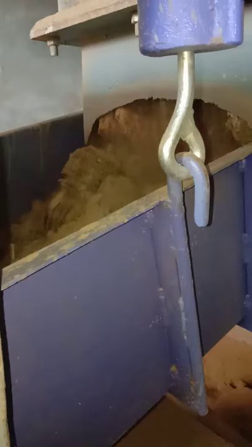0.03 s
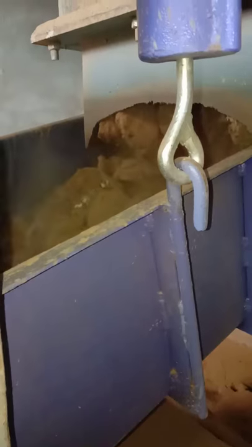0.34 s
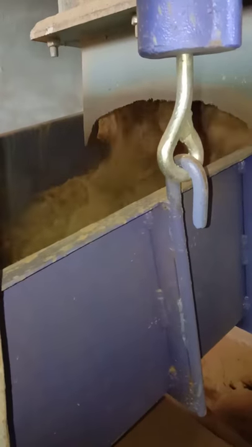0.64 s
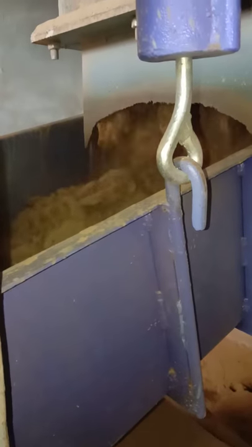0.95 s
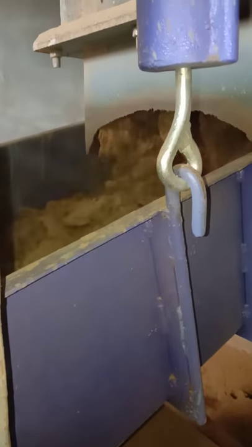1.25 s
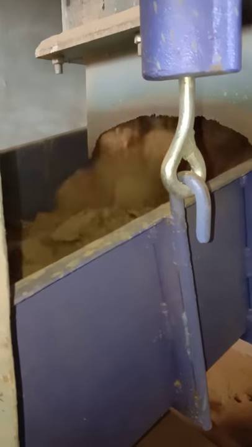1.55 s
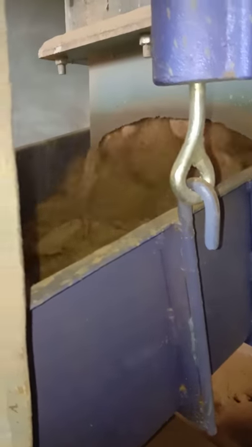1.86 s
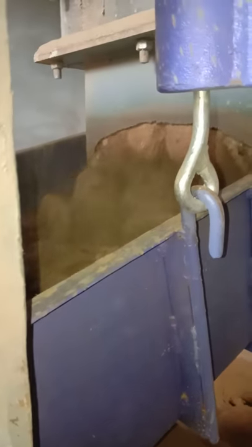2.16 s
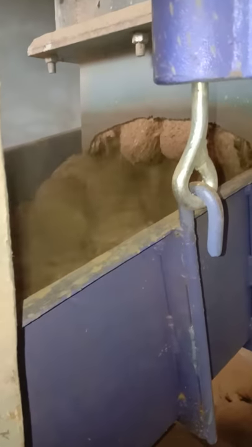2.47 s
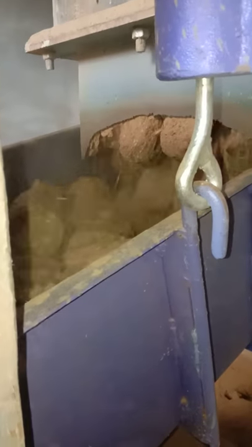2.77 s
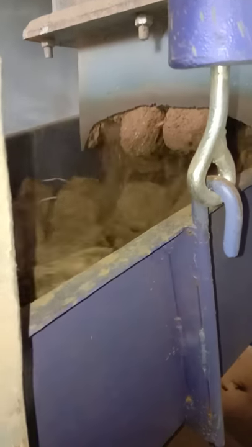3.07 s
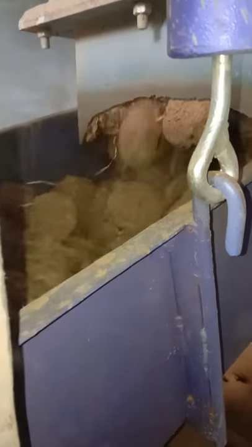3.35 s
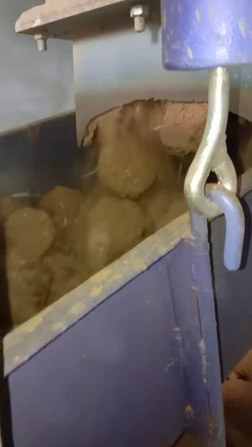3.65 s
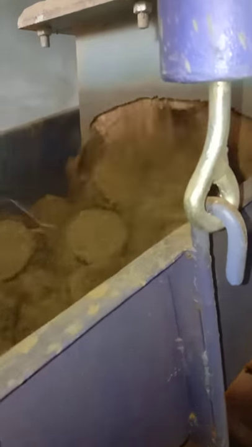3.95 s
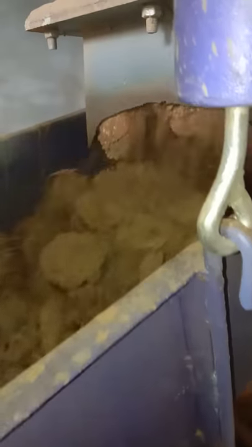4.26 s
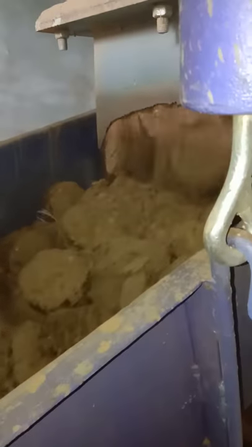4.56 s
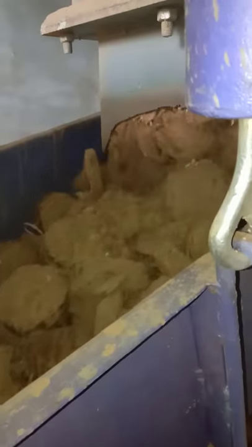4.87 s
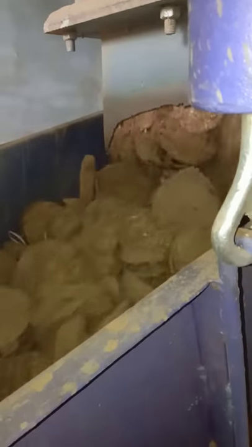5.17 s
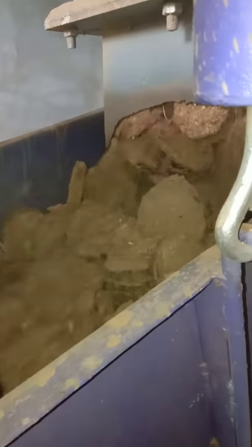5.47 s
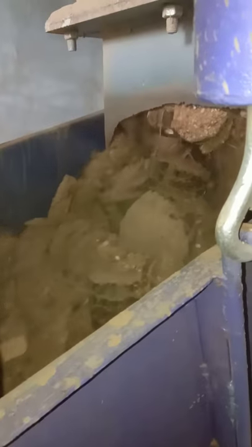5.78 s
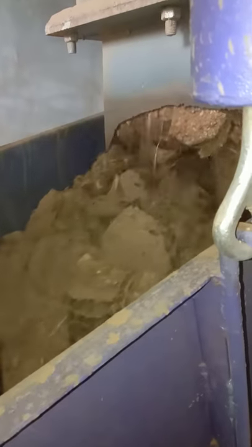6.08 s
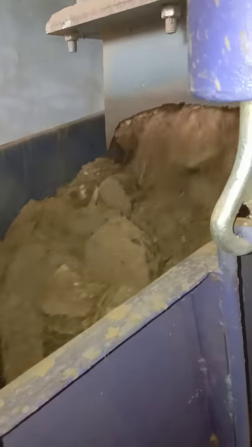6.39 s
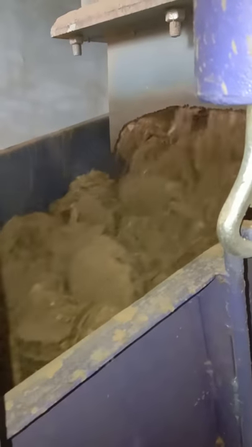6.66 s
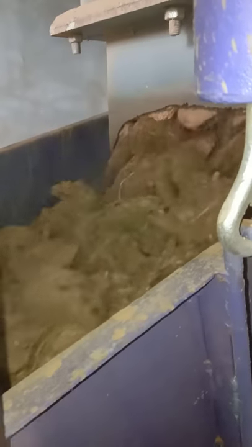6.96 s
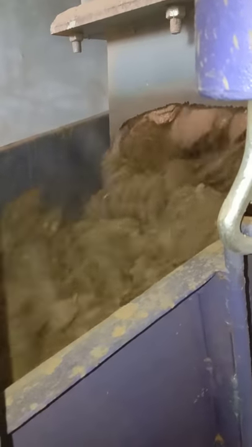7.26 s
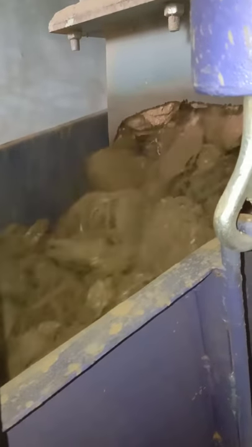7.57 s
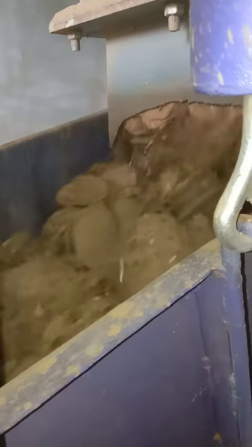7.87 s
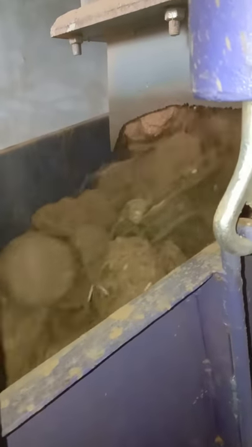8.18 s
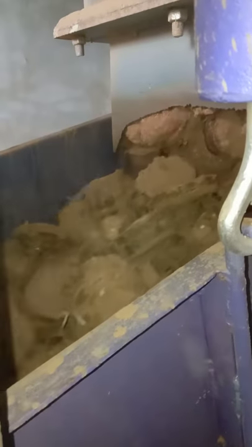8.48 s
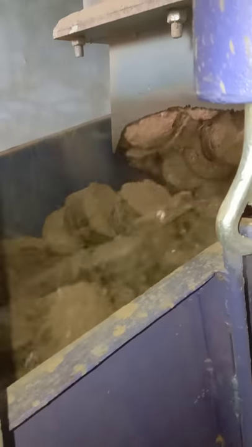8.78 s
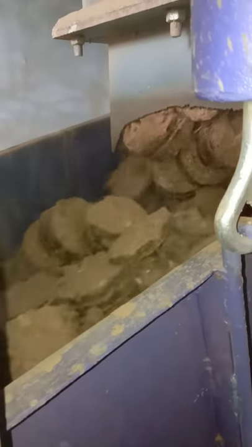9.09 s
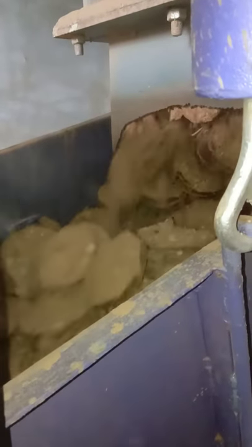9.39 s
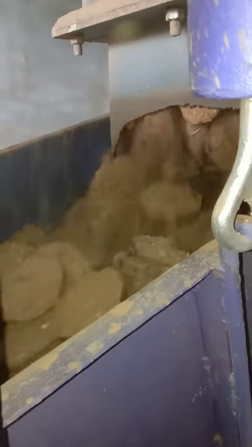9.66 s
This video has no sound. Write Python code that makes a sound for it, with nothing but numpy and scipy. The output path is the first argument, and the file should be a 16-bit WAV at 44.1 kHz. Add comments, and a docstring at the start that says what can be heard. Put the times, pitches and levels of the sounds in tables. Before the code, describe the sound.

Soft lumps rumble and knock through a humming, shaking metal trough as grit hisses and other factory machines drone.

```python
"""Vibrating feeder in a plant hall

An electromagnetic feeder hums as it shakes a steel trough fifty times a second. Clods drop from a
chute, thud and rumble; crumbs crunch and fine grit hisses with each stroke. A steel hanger chatters,
hard bits scrape the wall and a lump rattles the chute, while other machines drone and whine.
Two microphone ports stand close by, the left one facing the trough."""
import sys
import numpy as np
from scipy import signal
from scipy.fft import rfft, irfft, next_fast_len
from scipy.io import wavfile
from scipy.ndimage import uniform_filter1d

SR = 44100
rng = np.random.default_rng(int(sys.argv[2]) if len(sys.argv) > 2 else 0)


def waveform_to_disk(signal):
    """Save audio, clipped to [-1, 1], as 16-bit WAV at the path in sys.argv[1]."""
    frames = np.transpose(np.atleast_2d(signal))
    scaled = np.clip(frames, -1, 1) * 32767
    samples = np.round(scaled).astype(np.int16)
    wavfile.write(sys.argv[1], SR, samples)


N = 437913
TIME = np.arange(N) / SR
FFT_SIZE = next_fast_len(N + 16384, real=True)
BIN_HZ = np.maximum(np.arange(FFT_SIZE // 2 + 1) * SR / FFT_SIZE, 1)


def from_db(db):
    """Decibels to gain."""
    return 10 ** (np.asarray(db) / 20)


def unit_rms(x):
    """Scale to unit power."""
    return x / np.sqrt(np.mean(x ** 2) + 1e-20)


def in_time(rows):
    """Columns of an automation curve at every sample."""
    times, *columns = np.transpose(rows)
    return [np.interp(TIME, times, column) for column in columns]


def in_frequency(rows):
    """Columns of an EQ curve at every bin."""
    hz, *columns = np.transpose(rows)
    return [np.interp(np.log(BIN_HZ), np.log(hz), column) for column in columns]


def drift(rate):
    """Slow random wander of spread 1, changing about `rate` times a second."""
    hop, run_in = 40, 2000
    pole = np.exp(-2 * np.pi * rate * hop / SR)
    noise = rng.standard_normal(N // hop + run_in + 2)
    slow = signal.lfilter([1], [1, -2 * pole, pole * pole], noise)[run_in:]
    return np.interp(np.arange(N) / hop, np.arange(len(slow)), unit_rms(slow))


def contacts(per_s, spread_db, t60, colour, spots=10):
    """Random touches of uneven size, dealt to spots that each ring briefly with their own dense modes."""
    sizes = from_db(spread_db * np.minimum(rng.exponential(1, N), 4)) * rng.choice([-1, 1], N)
    clicks = sizes * (rng.random(N) < per_s / SR)
    spot, age = rng.integers(0, spots, N), TIME[:2048]
    spectra = rfft(rng.standard_normal((spots, len(age))) * from_db(-60 * age / t60), 2 * len(age))
    rings = irfft(spectra / np.linalg.norm(spectra, axis=0))[:, :len(age)]   # together, a flat spectrum
    sound = sum(signal.oaconvolve(clicks * (spot == k), rings[k])[:N] for k in range(spots))
    eq = from_db(in_frequency(colour)[0])
    return unit_rms(irfft(rfft(sound, FFT_SIZE) * eq, FFT_SIZE)[:N])


def evened(x, window_s):
    """Hold the power steady over a short window, so that the flow sets the level."""
    size = int(window_s * SR)
    return x / np.sqrt(uniform_filter1d(uniform_filter1d(x ** 2, size), size) + 1e-9)


def ring(clicks, hz, t60):
    """One mode of steel: a unit click starts a decaying sine of height 1."""
    pole, step = from_db(-60 / (t60 * SR)), 2 * np.pi * hz / SR
    return signal.lfilter([np.sin(step)], [1, -2 * pole * np.cos(step), pole * pole], clicks + 1e-18)


# The drive's hum. Each row: multiple of the stroke rate, relative level in dB.
HUM_HARMONICS = [(1, -35), (2, -34.5), (3, -46), (4, -34.5), (6, -38), (7, -38.5), (8, -37.5), (9, -38),
                 (10, -43), (11, -49), (14, -46), (15, -61), (16, -49), (17, -49), (18, -52), (19, -49),
                 (21, -52.5), (29, -52)]
# The ninth harmonic swells and sinks. Each row: time in seconds, relative level in dB.
NINTH_RIDE = [(0.4, -6), (1.2, -4), (1.45, 0), (1.8, -3.5), (2.5, -1.5), (3.3, 7), (3.8, 0.5), (4.35, 2.5),
              (4.7, -3), (5.2, 3), (5.7, -0.5), (6.25, -1), (6.9, 4.5), (7.25, -1), (7.55, 0), (8.1, 1.5),
              (8.7, 5.5), (9.9, 2)]

def drive_hum(stroke, level_db, waver_db, smear_rad):
    """Harmonics of the stroke; the shifting load makes them waver in level and phase."""
    out = np.zeros(N)
    ninth_db, = in_time(NINTH_RIDE)
    for multiple, db in HUM_HARMONICS:
        swell_db = ninth_db - ninth_db.mean() if multiple == 9 else waver_db * drift(3)
        phase = multiple * stroke + smear_rad * drift(4.2) + 2 * np.pi * rng.random()
        out += from_db(db + swell_db) * np.sin(phase)
    return np.sqrt(2) * from_db(level_db) * out


# The bed of drones and whines. Each row: pitch in Hz, width in Hz, relative level in dB.
MACHINE_TONES = [(116.3, 1.5, -30.5), (135.3, 2, -35), (172.5, 2.5, -34.5), (246.2, 1.5, -33.5),
                 (261.8, 1, -41.5), (595.5, 1.5, -48), (4892, 22, -50), (6455, 25, -51)]

def machinery(level_db, restless):
    """Narrow, restless tones from motors and bearings in the hall."""
    out = np.zeros(N)
    for hz, width, db in MACHINE_TONES:
        phase = 2 * np.pi * np.cumsum(hz + .5 * width * drift(width)) / SR
        out += np.sqrt(2) * from_db(db) * (1 + restless * drift(width)) * np.sin(phase)
    return from_db(level_db) * out


# The hanger's ring. Each row: pitch in Hz, relative level in dB, time to fall 60 dB in seconds.
HANGER_MODES = [(2150, -52, .03), (2325, -48, .07), (2510, -57, .07), (3229, -56, .15), (4330, -54, .02),
                (4524, -55.5, .09), (5280, -55.5, .025), (6390, -48.5, .03), (6480, -47.2, .033)]
# How hard it chatters. Each row: time in seconds, relative level in dB.
HANGER_RIDE = [(.4, -.5), (.8, 4), (1.25, 3), (1.42, -1), (1.65, 4), (2.08, -0.5), (2.48, -2), (3.55, -12),
               (3.86, -4), (4.3, -6), (4.9, 0), (5.02, 2), (5.6, 1), (5.8, -6), (6.15, 2), (6.33, -4),
               (7.05, -5), (7.18, 1), (7.7, -0.5), (8.1, 2), (8.45, -2), (9.15, -0.5), (9.6, -5), (9.9, 4)]

def hanger_chatter(per_s, spread_db, level_db):
    """Uneven taps of hook on eye keep the steel ringing; each tap strikes every mode differently."""
    taps = np.flatnonzero(rng.random(N) < per_s * from_db(1.8 * drift(20)) / SR)
    force = from_db(spread_db * rng.standard_normal(N)[taps])
    out = np.zeros(N)
    for hz, db, t60 in HANGER_MODES:
        clicks = np.zeros(N)
        clicks[taps] = force * rng.standard_normal(N)[taps]
        out += from_db(db) * unit_rms(ring(clicks, hz, t60))
    return from_db(level_db + in_time(HANGER_RIDE)[0]) * out


# How the stroke bunches the small landings. Each row: multiple of the stroke rate, depth in dB.
TOSS_PULSE = [(1, .75), (2, .95), (3, .75)]
# Small stuff pouring from the chute. Each row: time in seconds, crunch level in dB, hiss level in dB.
FINES_RIDE = [(0.4, -32, -36), (0.9, -31.5, -34.5), (1.4, -33, -35.5), (1.65, -30.5, -33.5),
              (2.5, -32, -35.5), (2.9, -32.5, -36), (3.15, -31, -32.5), (3.9, -32.5, -34.5),
              (5.65, -31, -34.5), (5.9, -30.5, -35), (6.22, -31, -34), (6.32, -34, -37.5),
              (6.43, -31.5, -34.5), (7.15, -32, -33.5), (7.65, -29.3, -32.5), (7.9, -31.5, -33),
              (9.9, -31.5, -35)]
# The midrange crunch of crumbs and the bright hiss of grit. Each row: frequency in Hz, gain in dB.
CRUNCH_EQ = [(150, -20), (450, -1), (750, 2), (1050, -1.5), (1420, 1.2), (1650, -2.3), (2100, -3.3),
             (2450, -2.8), (2800, -11.5), (5000, -18), (12000, -38)]
GRIT_EQ = [(1000, -30), (3200, -8), (4400, -5.3), (5700, -3.3), (6500, 0), (6900, -.5), (7400, -5.3),
           (8000, -10), (9000, -14.3), (11000, -16), (11900, -18), (13000, -16.3), (15300, -14.5)]

def crumbs_and_grit(stroke, wander_db):
    """Small bits are tossed by each stroke and land in loose bursts."""
    crunch_db, hiss_db = in_time(FINES_RIDE) + wander_db
    toss = from_db(sum(db * np.cos(multiple * stroke) for multiple, db in TOSS_PULSE))
    shower = drift(12)   # a breaking clod sheds crumbs and grit together
    crunch = contacts(7000 * toss * from_db(1.1 * shower), spread_db=2.5, t60=0.0099, colour=CRUNCH_EQ)
    grit = contacts(7000 * toss * from_db(1.9 * shower), spread_db=2.0, t60=0.007, colour=GRIT_EQ)
    return (from_db(crunch_db) * evened(crunch, window_s=0.13)
            + from_db(hiss_db) * evened(grit, window_s=0.18))


# Brief dips in the low rumble. Each row: centre in seconds, length in seconds, depth in dB.
RUMBLE_DIPS = [(0.953, 0.092, -14), (1.39, 0.063, -12), (1.89, 0.066, -12), (2.116, 0.044, -8),
               (2.53, .04, -8), (3.02, 0.045, -10), (3.652, .07, -7), (4.22, .06, -6), (4.40, .06, -9),
               (4.67, 0.06, -7), (5.63, 0.073, -9), (6.773, 0.14, -14), (7.264, .05, -5), (8.06, 0.081, -3),
               (8.646, 0.042, -7), (9.116, .07, -10), (9.45, 0.1, -8)]

def rumble_dip_db():
    """Brief, smooth dips in the level of the low rumble, shared in part by the drone."""
    return sum(db * np.exp(-(2 * (TIME - centre) / length) ** 2) for centre, length, db in RUMBLE_DIPS)


def tumbling_db(clods, stream_db, wander_db):
    """Level of an uneven stream of lumps; each big clod adds a swell as it rolls on and settles."""
    rise_s, fade_s, roll_db = 0.015, 0.015, -9   # the roll sits under the blow that starts it
    power = from_db(stream_db + wander_db * drift(5.8)) ** 2
    for start_s, db, _, roll_s in clods:
        start = int(start_s * SR)
        age = TIME[:min(SR // 2, N - start)]
        swell = np.minimum(age / rise_s, 1) * np.exp(-np.maximum(age - roll_s, 0) / fade_s)
        power[start:start + len(age)] += (from_db(db + roll_db) * swell) ** 2
    return 10 * np.log10(power)


# Deep rumble of lump on floor, rounder knock of lump on lump. Each row: frequency in Hz, gain in dB.
RUMBLE_EQ = [(10, -28), (25, -33), (42, -23), (58, -10.5), (72, -3.5), (85, -0.5), (93, 2), (104, -3),
             (122, -1), (146, -14), (170, -11.5), (250, -25.5), (600, -72)]
KNOCK_EQ = [(50, -44), (110, -14), (165, -3), (230, -1), (290, -4), (350, -7), (430, -10), (700, -16.5),
            (1500, -50), (5000, -75)]

def lump_stream(rumble_db, knock_db):
    """Soft lumps tumble on the trough floor and against one another."""
    rumble = evened(contacts(per_s=1500, spread_db=2.3, t60=0.03, colour=RUMBLE_EQ), window_s=0.071)
    knocks = evened(contacts(per_s=1500, spread_db=2.5, t60=0.031, colour=KNOCK_EQ), window_s=0.036)
    return from_db(rumble_db) * rumble + from_db(knock_db) * knocks


# Heavy clods land in the trough, and bump into one another.
# Each row: start in seconds, relative level in dB, centre pitch in Hz, roll in seconds.
CLOD_LANDINGS = [(.255, -11.5, 135, .02), (0.31, -14.5, 97, 0.047), (.5, -19, 90, 0.037),
                 (.566, -21, 114, .02), (0.626, -18.5, 112, 0.027), (.781, -19.5, 129, .04),
                 (1.19, -22, 116, 0.018), (1.435, -13, 104, 0.039), (1.563, -14, 124.6, 0.037),
                 (1.729, -15, 106, .03), (1.965, -19, 108, .02), (2.149, -14, 86.5, 0.057),
                 (2.337, -19, 116, .02), (2.453, -10.5, 105, 0.028), (2.555, -21, 118, 0.018),
                 (2.622, -13, 128, .022), (2.73, -22, 117, .02), (3.078, -17, 101, 0.049),
                 (3.714, -15, 127, .03), (3.821, -10.5, 116, .03), (3.933, -16, 121, .03),
                 (4.073, -13, 101, 0.08), (4.474, -10, 86, 0.044), (4.717, -16, 99, 0.037),
                 (4.798, -21, 121, 0.05), (4.954, -12.5, 117, 0.025), (5.056, -16, 116, 0.034),
                 (5.211, -18, 98, 0.045), (5.3, -19, 109, .04), (5.384, -14.5, 97, 0.046),
                 (5.672, -24, 100, .02), (5.775, -13, 103, 0.054), (5.83, -16.5, 88, 0.094),
                 (5.956, -12.5, 115.5, 0.024), (6.019, -18, 116, 0.017), (6.308, -13.5, 101, .03),
                 (6.619, -16, 110, 0.021), (6.843, -20, 102, .03), (7.442, -16, 93.5, .04),
                 (7.497, -14, 106, 0.04), (7.559, -19, 114, .03), (7.608, -19, 107.5, 0.045),
                 (7.817, -19, 105, .03), (7.921, -21, 88, .03), (8.15, -15.5, 93, 0.027),
                 (8.36, -20, 113, .02), (8.418, -17, 111, .03), (8.503, -21, 116, .02),
                 (8.57, -17.5, 89, .03), (8.68, -15.5, 118, 0.022), (8.798, -19, 82, 0.034),
                 (8.968, -20, 112, .02), (9.022, -21, 99, .02), (9.253, -13.5, 107, .025),
                 (9.352, -18, 107, .02), (9.543, -16.5, 94, 0.043), (9.718, -9, 103, 0.055),
                 (9.841, -19, 117, .03)]
CLOD_BUMPS = [(.405, -20, 207, .02), (.823, -21, 208, .02), (1.281, -19.5, 178, 0.03),
              (1.338, -19, 184, 0.027), (1.726, -20, 278, 0.025), (1.782, -21.5, 228, .02),
              (1.94, -17, 168, 0.023), (2.171, -17.5, 218, 0.041), (2.344, -16, 180, 0.017),
              (2.675, -15.5, 224, 0.031), (2.989, -20.5, 244, 0.023), (3.762, -14.5, 212, 0.023),
              (4.521, -16, 236, 0.049), (4.584, -17.5, 228, 0.019), (4.635, -16.5, 240, 0.018),
              (4.79, -14.5, 163, 0.042), (4.884, -20.5, 212, 0.031), (5.085, -20.5, 182, 0.018),
              (5.307, -19, 180, .02), (5.456, -14, 183, 0.043), (6.635, -15.5, 168, .06),
              (7.698, -16.5, 172, 0.03), (7.876, -25, 228, .02), (8.179, -17, 210, 0.048),
              (8.3, -20, 200, 0.044), (8.953, -18.5, 169, 0.025), (9.614, -18, 224, 0.018),
              (9.661, -14.5, 209, 0.064), (9.83, -15.5, 248, .03)]

def clod_thumps(clods, rise_s, fade_s, sag, level_db):
    """A soft clod squashes and rebounds in a few swings; size sets the pitch, which sags as it settles."""
    out = np.zeros(N)
    for (start_s, db, hz, _), phase in zip(clods, rng.random(len(clods))):
        start = int(start_s * SR)
        age = TIME[:min(SR // 4, N - start)]
        attack = np.sin(np.pi / 2 * np.minimum(age / rise_s, 1)) ** 2
        push = attack / np.cosh(np.maximum(age - rise_s, 0) / fade_s)
        pitch = hz * (1 + sag * (2 * np.exp(-age / (rise_s + fade_s)) - 1))
        swing = np.sin(2 * np.pi * (np.cumsum(pitch) / SR + phase))
        out[start:start + len(age)] += from_db(db) * push * swing
    return from_db(level_db) * out


# The loaded trough's boom. Each row: pitch in Hz, relative level in dB, time to fall 60 dB in seconds.
TROUGH_MODES = [(79.7, -2.5, 0.24), (107.5, -2.5, 0.2), (124.4, 2.5, 0.28)]

def trough_boom(level_db, squash_s):
    """Each landing sets the lowest modes of the trough swinging."""
    out = np.zeros(N)
    for start_s, db, *_ in CLOD_LANDINGS:
        start = int(start_s * SR)
        age = TIME[:min(SR // 2, N - start)]
        push = 1 - np.exp(-age / squash_s)
        for hz, mode_db, t60 in TROUGH_MODES:
            swing = np.sin(2 * np.pi * (hz * age + rng.random()))
            out[start:start + len(age)] += push * from_db(db + mode_db - 60 * age / t60) * swing
    return from_db(level_db) * out


# Hard bits strike or scrape the wall. Each row: start in seconds, relative level in dB,
# low and high band edges in Hz, rise and fade in seconds.
WALL_SCRAPES = [(1.625, -29, 1900, 5000, 0.013, .04), (1.710, -40, 4300, 8000, 0.0027, .02),
                (1.779, -31, 5500, 8000, .003, .015), (2.969, -32, 3000, 8000, .002, .008),
                (3.112, -33, 6500, 14500, .004, .035), (3.331, -32, 5500, 14500, .003, .015),
                (3.358, -33, 5500, 14000, .003, .014), (4.004, -27, 4000, 8850, 0.0023, .01),
                (4.230, -28, 900, 2760, 0.0092, 0.055), (4.235, -36, 8900, 12000, 0.017, .035),
                (4.775, -34.5, 7000, 14000, .005, .02), (5.382, -27, 4000, 7500, .003, 0.015),
                (5.860, -30, 950, 2200, 0.013, 0.036), (6.640, -23, 500, 1400, 0.007, 0.02),
                (7.020, -31, 1600, 4000, .003, .012), (7.404, -24, 5000, 7550, 0.0034, .008),
                (7.425, -29, 7300, 8400, .012, .028), (7.503, -24, 1800, 2800, 0.0034, .006),
                (7.534, -22, 1600, 2700, 0.0026, 0.0046), (7.600, -26, 1100, 4400, .035, 0.05),
                (7.618, -22, 1650, 2550, .004, 0.022), (7.642, -22.5, 1650, 2600, 0.004, .018),
                (7.674, -29, 1700, 2700, .004, .016), (8.065, -26, 550, 1400, 0.0073, 0.017),
                (8.415, -31, 4500, 7500, .003, .012), (8.919, -28, 4000, 7500, .003, .012),
                (9.215, -28, 500, 1400, 0.0087, 0.016)]

def wall_scrapes(level_db, grains_per_s):
    """Each hard bit skips over the steel in a short, grainy rasp."""
    out, age = np.zeros(N), TIME[:SR // 3]
    for start_s, db, low, high, rise, fade in WALL_SCRAPES:
        grains = rng.choice([-1, 1], len(age)) * (rng.random(len(age)) < grains_per_s / SR)
        band = signal.butter(2, [low, high], "band", fs=SR, output="sos")
        rasp = unit_rms(signal.sosfilt(band, grains))
        pressure = np.minimum(age / rise, 1) * np.exp(-np.maximum(age - rise, 0) / fade)
        start = int(start_s * SR)
        out[start:start + len(age)] += from_db(db) * pressure * rasp
    return from_db(level_db) * out


# A hard lump rattles against the chute. Each row: start in seconds, strength in dB.
RATTLE_TAPS = [(5.848, -1), (5.866, -1), (5.884, -2), (5.925, -7)]
# The chute's clang. Each row: pitch in Hz, relative level in dB, time to fall 60 dB in seconds.
CHUTE_MODES = [(750, -37, .1), (1122, -27, .13), (1300, -30, 0.16), (1840, -38, .1)]

def chute_rattle(level_db):
    """A few quick, uneven taps set the sheet steel of the chute ringing."""
    tap_s, tap_db = np.transpose(RATTLE_TAPS)
    out = np.zeros(N)
    for hz, mode_db, t60 in CHUTE_MODES:
        strike_s = tap_s + rng.random(len(tap_s)) / hz   # up to a cycle late, for a random phase
        clicks = np.zeros(N)
        clicks[(strike_s * SR).astype(int)] = from_db(tap_db + mode_db)
        out += ring(clicks, hz, t60)
    return from_db(level_db) * out


# The stereo image. Each row: frequency in Hz, left port's extra level in dB,
# its phase lead in radians on top of the lag, likeness of the two ports from 0 to 1.
PORT_IMAGE = [(50, 4.7, -.3, .995), (150, 3.4, -.2, .996), (300, 4.7, -.17, .993), (700, 8.7, -.08, .986),
              (1400, 6.9, -.04, .94), (2200, 7.2, -.03, .87), (3000, 6.5, -.05, .74),
              (5000, 7.2, -.08, .83), (6500, 3.1, -.1, .92), (7500, .8, -.12, .85), (9000, 0, -.2, .88),
              (15000, 0, -.3, .88)]

def microphone_ports(sound, lag_s, hall_t60):
    """The right port hears the sound later and shaded, mixed with scatter from the hall."""
    louder_db, lead, alike = in_frequency(PORT_IMAGE)
    age = TIME[:16384]
    hall = rng.standard_normal(len(age)) * from_db(-60 * age / hall_t60)
    scatter = rfft(hall / np.linalg.norm(hall), FFT_SIZE)
    direct = np.exp(-1j * (2 * np.pi * BIN_HZ * lag_s + lead))
    path = from_db(-louder_db) * (alike * direct + np.sqrt(1 - alike ** 2) * scatter)
    right = irfft(rfft(sound, FFT_SIZE) * path, FFT_SIZE)[:N]
    return np.array([sound, right])


def gain_control(stereo, threshold_db, squeeze, react_s, recover_db_per_s):
    """Loud moments on the left pull both channels down, so the hiss ducks under each heavy thud."""
    pole = np.exp(-1 / (react_s * SR))
    power = signal.lfilter([1 - pole], [1, -pole], stereo[0] ** 2)
    over_db = np.maximum(10 * np.log10(power + 1e-12) - threshold_db, 0)
    recovery_db = recover_db_per_s * TIME
    held_db = np.maximum.accumulate(over_db + recovery_db) - recovery_db
    return stereo * from_db(-squeeze * held_db)


def scene():
    """Feeder, material and hall, mixed at the two ports."""
    stroke_hz, drone_dip_share = 49.92, 0.28   # the drone dips a little with the rumble
    dip_db = rumble_dip_db()
    rumble_db = tumbling_db(CLOD_LANDINGS, stream_db=-26.5, wander_db=0.5) + dip_db
    knock_db = tumbling_db(CLOD_BUMPS, stream_db=-24.5, wander_db=0.6)
    fines_wander_db = 0.9 * drift(5.8)
    stroke = 2 * np.pi * stroke_hz * TIME + 0.036 * drift(.6)   # phase of the trough's shake
    hum = drive_hum(stroke, level_db=-1.9, waver_db=2.0, smear_rad=0.42)
    drone = from_db(drone_dip_share * dip_db) * (hum + machinery(level_db=-2.0, restless=0.56))
    chatter = hanger_chatter(per_s=260, spread_db=2.4, level_db=0.16)
    thuds = clod_thumps(CLOD_LANDINGS, rise_s=0.0077, fade_s=0.026, sag=0.14, level_db=-0.9)
    boom = trough_boom(level_db=-8.5, squash_s=0.0029)
    knocks = clod_thumps(CLOD_BUMPS, rise_s=0.0048, fade_s=0.017, sag=0.082, level_db=1.0)
    stream = lump_stream(rumble_db, knock_db) + crumbs_and_grit(stroke, fines_wander_db)
    hard_bits = wall_scrapes(level_db=-4.0, grains_per_s=3000) + chute_rattle(level_db=-1.5)
    mix = drone + chatter + thuds + boom + knocks + stream + hard_bits
    return microphone_ports(mix, lag_s=41 / SR, hall_t60=.6)


# The opening fade; its last gain holds to the end. Each row: time in seconds, gain in dB.
INPUT_FADE = [(0, -78), (.108, -77), (.12, -21.5), (.15, -14.5), (.21, -8.5), (.245, -5.5), (.27, -3.5),
              (.34, -0.5), (.42, 2.5)]

def record(dry):
    """The input fades in, gain control rides the heaviest thuds and the top is cut steeply."""
    faded = dry * from_db(in_time(INPUT_FADE)[0])
    sound = gain_control(faded, threshold_db=-19.5, squeeze=0.4, react_s=0.013, recover_db_per_s=92)
    cutoff_hz = 15560
    low_pass = 1 / np.sqrt(1 + (BIN_HZ / cutoff_hz) ** 1000)
    return irfft(rfft(sound, FFT_SIZE) * low_pass, FFT_SIZE)[:, :N]


dry = scene()
out = record(dry)
waveform_to_disk(out)
```